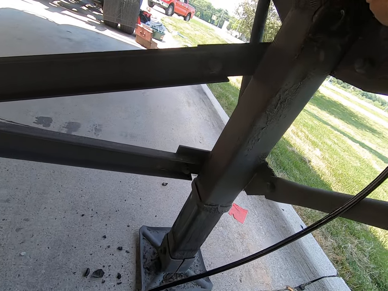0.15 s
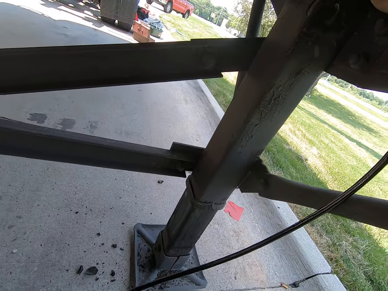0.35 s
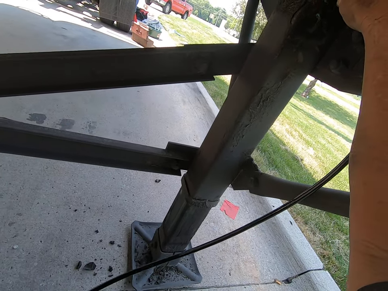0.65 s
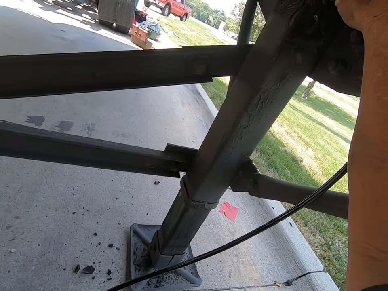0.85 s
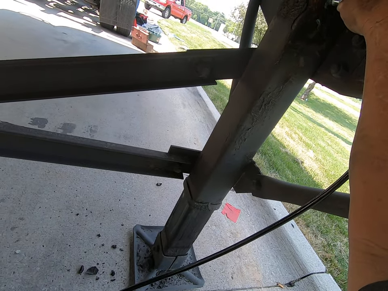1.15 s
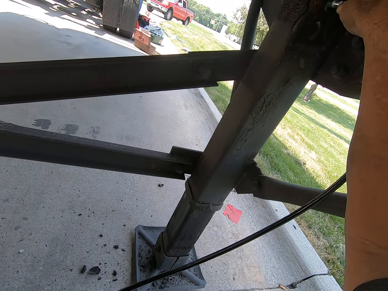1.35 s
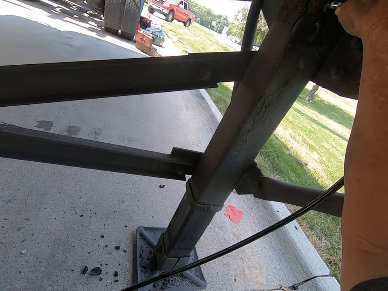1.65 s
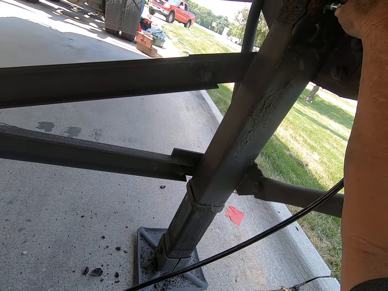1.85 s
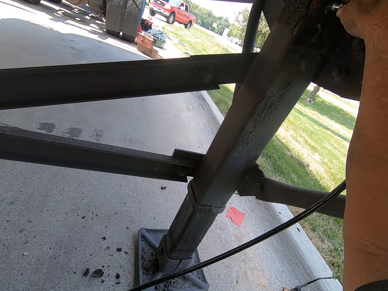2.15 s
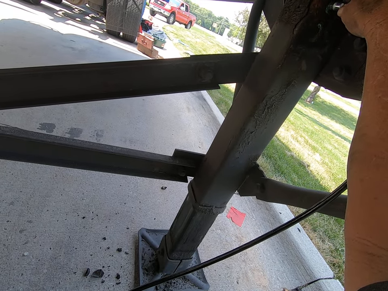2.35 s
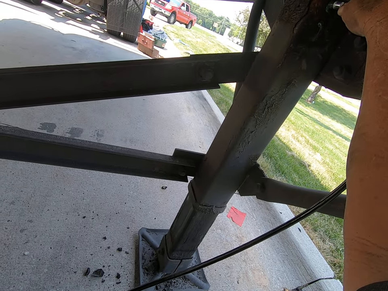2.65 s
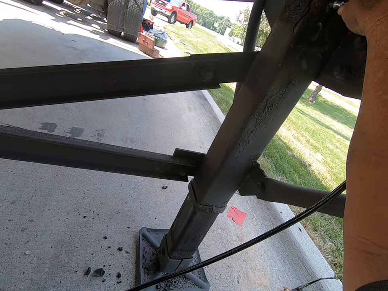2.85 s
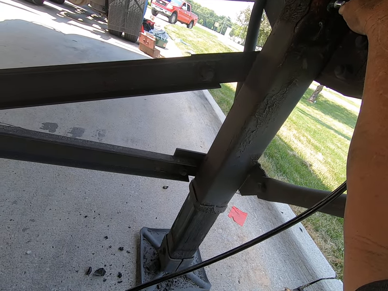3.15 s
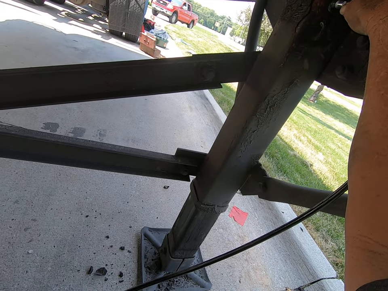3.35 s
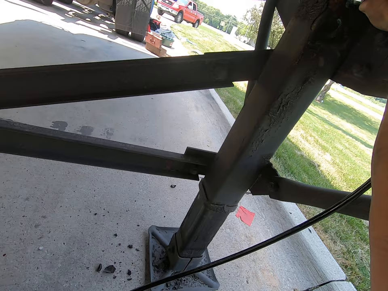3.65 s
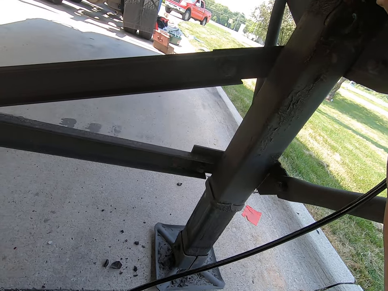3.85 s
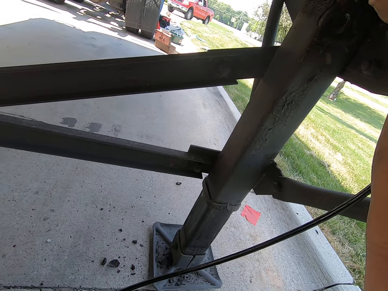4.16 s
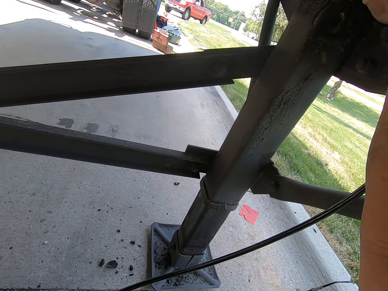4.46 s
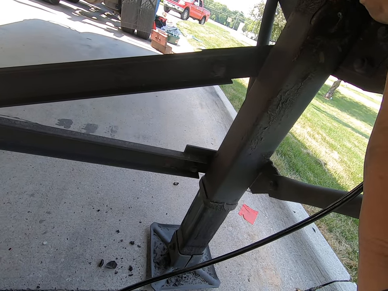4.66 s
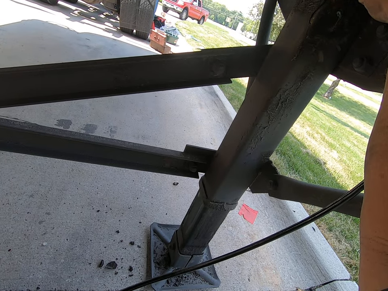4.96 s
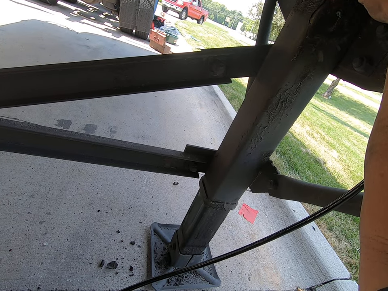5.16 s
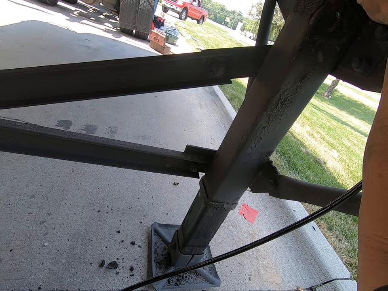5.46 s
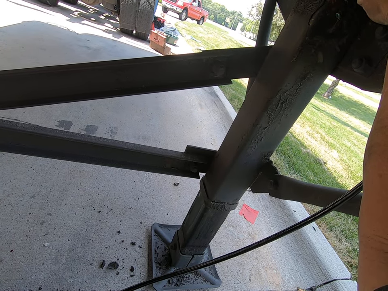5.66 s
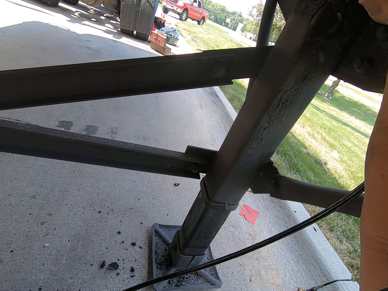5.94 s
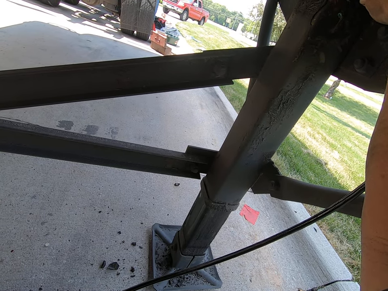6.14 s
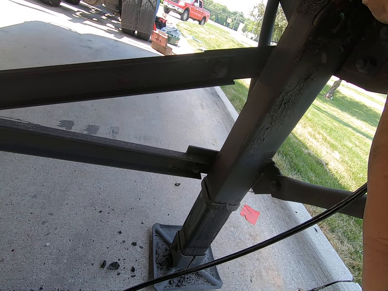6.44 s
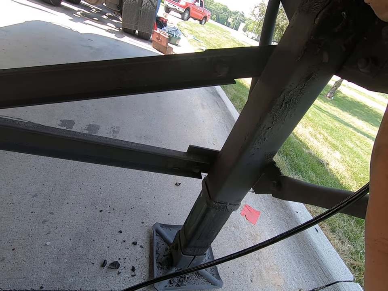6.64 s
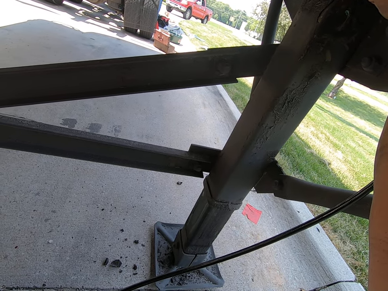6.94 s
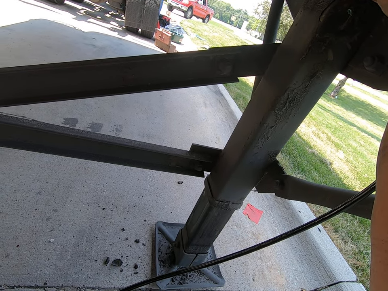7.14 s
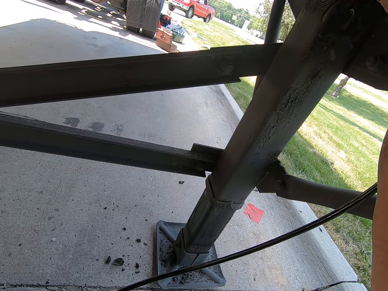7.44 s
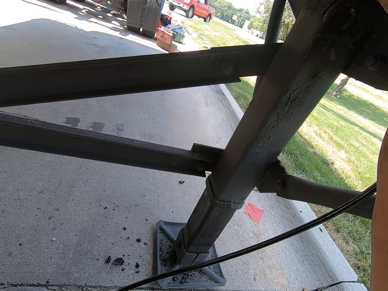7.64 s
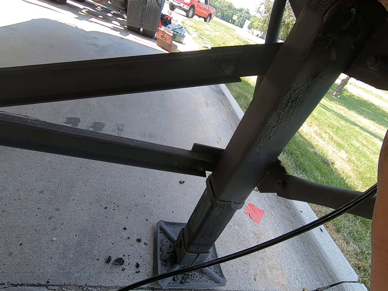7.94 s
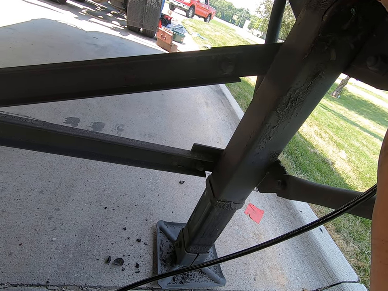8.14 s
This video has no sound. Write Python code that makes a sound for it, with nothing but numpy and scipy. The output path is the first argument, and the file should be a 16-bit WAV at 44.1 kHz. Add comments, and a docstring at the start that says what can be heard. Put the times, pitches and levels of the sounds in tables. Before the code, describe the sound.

A low, beating bed of several idling engines and a fan-like hum sits in the background. Something knocks the metal frame, a small plastic click follows, and a brief electronic whistle leads into a battery-powered grease pump right by the microphone. It buzzes and rattles harshly, whining high, clacking in a fast even rhythm as the plunger releases, without stopping. Dry open-air sound with short reflections off nearby steel.

```python
"""A cordless grease gun pumps under a trailer, close to the microphone: gear whine from a sine at the tooth rate,
rattle from noise in the housing modes. The motor slows on each plunger stroke and clacks as the cam lets go.
Further off in the yard three engines idle and beat against each other and a fan or alternator hums, all sums
of sines over a bed of shaped noise. A knock on the frame and the trigger come first, as pushes into resonances.
A small camera with two microphone ports and gain control listens."""
import sys
import numpy as np
from scipy import signal
from scipy.fft import rfft, irfft, next_fast_len
from scipy.io import wavfile
from scipy.ndimage import uniform_filter1d

SR = 44100
rng = np.random.default_rng(int(sys.argv[2]) if len(sys.argv) > 2 else 0)


def store_wav(level_fs):
    """Save 16-bit WAV to argv[1]."""
    pcm = np.round(np.clip(np.atleast_2d(level_fs), -1, 1) * 32767)
    wavfile.write(sys.argv[1], SR, pcm.T.astype(np.int16))


N = 365897
T = np.arange(N) / SR
FIRST_CLACK_S, STROKE_S = .9919, .13611  # the cam lets the plunger go once a turn
LEFT_RIGHT = np.array([[1], [-1]])


def undb(db):
    """Decibels to gain."""
    return 10 ** (np.asarray(db, float) / 20)


def unit(x):
    """Scaled to rms 1."""
    return x / np.sqrt(np.mean(x ** 2))


def ring(x, hz, width_hz):
    """One resonance, gain 1 at the centre."""
    return signal.lfilter(*signal.iirpeak(hz, hz / width_hz, fs=SR), x)


def colour(x, points):
    """Shapes the spectrum by (f/Hz, level/dB) points, joined along log frequency."""
    size = next_fast_len(len(x))
    hz, db = np.transpose(points)
    bin_hz = np.arange(size // 2 + 1) * SR / size
    gain = undb(np.interp(np.log(bin_hz + 1), np.log(hz), db))
    return irfft(rfft(x, size) * gain, size)[:len(x)]


def walk(rate):
    """Random levels held 1 / rate s and smoothed twice over that time; rms 1."""
    hold = int(SR / rate)
    steps = np.repeat(rng.standard_normal(N // hold + 1), hold)
    smooth = uniform_filter1d(uniform_filter1d(steps, hold), hold)
    return unit(smooth[:N])


def blows(times, db, contact_s, sharp=0.):
    """Short rough pushes of set strength at the given times; sharp adds a clean first contact."""
    size = int(6 * contact_s * SR) + 2
    fade = np.exp(-np.arange(size) / (contact_s * SR))
    push = rng.standard_normal((len(times), size)) * fade
    push = push * np.sqrt(contact_s * SR / 2) / np.linalg.norm(push, axis=1, keepdims=True)
    push[:, 0] += sharp
    out = np.zeros(N + size)
    places = (np.asarray(times) * SR).astype(int)[:, None] + np.arange(size)
    np.add.at(out, places, push * undb(db)[:, None])
    return out[:N]


def struck(hits, modes, contact_s, gain_db, sharp=0.):
    """A thing rings with its modes at every hit; two resonances in a row make each mode fall off steeply."""
    s, db = np.transpose(hits)
    push = blows(s, db, contact_s, sharp)
    ringing = sum(undb(mode_db) * ring(ring(push, hz, 3 * width), hz, width) for hz, width, mode_db in modes)
    return undb(gain_db) * ringing


def engines_and_hum():
    """Steady engine orders and a fan or alternator hum, multiples of each base rate, all wavering a little."""
    # three idling engines, then the hum of a fan or alternator: base rate [Hz]
    base_hz = [14.217, 18.655, 16.255, 138.0]
    # start of the first turn of each [s], which sets its phase
    start_s = [.01, 0.0029, 0, 0.00038]
    # one list for each of them: order [multiple of the base rate], level [dB]
    source_orders = [
        [(2, -78), (4, -32.5), (5, -56), (9, -51), (10, -47), (11, -74), (12, -39.5), (13, -40)],
        [(3, -36), (5, -55), (6, -53), (7, -76), (8, -47.5)],
        [(2, -57), (5, -44.5), (6, -55), (8, -43.5), (10, -46.5), (14, -53), (16, -53)],
        [(1, -32), (2, -51.5)],
    ]
    out = 0
    for hz, start, orders in zip(base_hz, start_s, source_orders):
        phase = 2 * np.pi * hz * (T - start)
        for order, db in orders:
            level = np.sqrt(2) * undb(db + 1.2 * walk(7))
            out = out + level * np.cos(order * phase + .15 * walk(5))
    return out


def yard():
    """Rumble and rush from all around: shaped noise that flickers with the clatter of the engines."""
    # exhaust rumble and mechanical rush: f/Hz, level/dB per Hz, relative
    rush = [(22, -13), (32, 1.5), (55, -0.5), (88, -3), (130, 1), (175, -2), (230, -13), (400, -16),
            (600, -15.5), (850, -23), (1300, -18.5), (1800, -26.5), (3200, -31.5), (5000, -48), (9000, -52),
            (11000, -60), (15000, -78)]
    # sound unrelated at the two ports, against the shared part: f/Hz, level/dB
    rush_apart = [(30, -9), (60, -13), (125, -19.5), (300, -15), (600, -7.5), (1100, 1), (3000, -3),
                  (14000, 2)]
    clatter = undb(1.0 * walk(40) + 0.53 * walk(2.6))
    mid, side = (undb(-29.5) * unit(colour(rng.standard_normal(N) * clatter, rush)) for _ in range(2))
    return mid + colour(side, rush_apart) * LEFT_RIGHT


def knock():
    """A knock lands twice on the frame, which keeps rattling for a moment; the first contact also cracks."""
    # landings: t/s, level/dB before the gains below
    landings = [(.2185, -19), (.2245, -25)]
    # frame modes: f/Hz, width/Hz of the sharper resonance, level/dB
    frame_modes = [(340, 100, 9.5), (474, 78, 11.5), (567, 43, 13.5), (685, 100, 8), (960, 120, 8.5),
                   (1250, 140, 7.5), (1400, 150, -2), (1690, 160, 2), (2270, 400, -30)]
    # modes of the first contact: f/Hz, width/Hz of the sharper resonance, level/dB
    crack_modes = [(3800, 1400, -3), (6840, 1100, -8.5)]
    frame = struck(landings, frame_modes, .03, 5.4, sharp=18.0)
    return frame + struck(landings[:1], crack_modes, 0.0039, 2.8)


def trigger():
    """Small contacts ring the trigger's own modes."""
    # contacts: t/s, level/dB before the gain below
    contacts = [(.7455, -36), (.7600, -23), (.7635, -27), (.7745, -40)]
    # trigger modes: f/Hz, width/Hz of the sharper resonance, level/dB
    trigger_modes = [(2700, 500, 2.5), (3480, 400, 0), (5000, 500, 2), (6960, 550, 5), (8400, 670, -2),
                     (12500, 3400, -20)]
    return struck(contacts, trigger_modes, 0.0025, 5.2)


def controller():
    """The speed controller switches the motor while the trigger travels: a steady tone and its octave."""
    # switching tone: t/s, level/dB at 1x, level/dB at 2x
    switching = [(.77, -70, -70), (.785, -49, -48), (.82, -40, -53), (.865, -39, -55), (.885, -67, -70)]
    switch_hz = 1984
    s, *levels = np.transpose(switching)
    out = 0
    for multiple, db in enumerate(levels, 1):
        level = np.sqrt(2) * undb(np.interp(T, s, db, -120, -120))
        out = out + level * np.sin(2 * np.pi * multiple * switch_hz * T)
    return out


def stroke(share):
    """Tooth mesh rate (Hz) and load (gain) through one turn of the cam, as shares counted from the clack."""
    fastest_at, slowest_at = .58, .9  # the motor speeds up unloaded and bogs down on the push
    free_mesh_hz, loaded_mesh_hz = 4380, 4008
    push_from, push_rise = .52, .1  # the grease load comes on
    rattle_fade = .16  # the parts settle after the release
    fall = slowest_at - fastest_at
    since = (share - fastest_at) % 1
    slowing = np.cos(np.pi / 2 * np.minimum(since / fall, 1)) ** 2
    speeding = np.sin(np.pi / 2 * np.maximum(since - fall, 0) / (1 - fall)) ** 1.3
    mesh_hz = loaded_mesh_hz + (free_mesh_hz - loaded_mesh_hz) * (slowing + speeding)
    load = np.exp(-share / rattle_fade) + np.clip((share - push_from) / push_rise, 0, 1)
    return mesh_hz, load


def gear_whine(mesh_hz, load):
    """The tooth mesh sings and swells as it passes resonances; other meshes are heard under load."""
    # resonances the whine passes: f/Hz, width/Hz, level/dB
    whine_modes = [(4020, 55, 2), (4264, 35, -.5), (4366, 55, -.5)]
    # other meshes: rate [multiple of the mesh], level/dB before load
    gear_lines = [(.79, -42), (.845, -40), (1.66, -42)]
    phase = 2 * np.pi * np.cumsum(mesh_hz * (1 + .0015 * walk(60))) / SR
    mesh = np.sqrt(2) * undb(-29 + 1.5 * walk(50)) * np.sin(phase)
    whine = sum(undb(db) * ring(mesh, hz, width) for hz, width, db in whine_modes)
    for multiple, db in gear_lines:
        whine = whine + load * undb(db + 3.1 * walk(40)) * np.sin(multiple * phase)
    return whine


def cam_blows():
    """The released plunger clacks and bounces, then the cam meets it again; timing and force scatter."""
    # blows within a clack, then the bounce: t/s from the release, level/dB
    clack_blows = [(-.0006, -2), (.0007, 0), (.002, -5), (.0036, -11), (.0072, -10), (.0086, -9),
                   (.011, -14)]
    clack_db, clack_scatter_db = 1.5, 1.7
    engage_s, engage_db = .0805, -8  # the cam meets the plunger again
    at = np.arange(FIRST_CLACK_S, N / SR, STROKE_S)
    luck = rng.standard_normal((len(clack_blows) + 1, 2, len(at)))
    clack = 0
    for (lag, db), (late, force) in zip(clack_blows, luck):
        blow_db = clack_db + db + clack_scatter_db * force
        clack = clack + blows(at + lag + .0002 * late, blow_db, .0003, sharp=2.5)
    late, force = luck[-1]
    engage = blows(at + engage_s + .001 * late, engage_db + 1.6 * force, .0004, sharp=4.5)
    return clack, engage


def grease_gun():
    """Tooth whine and gear rattle follow the stroke; rattle and blows ring the housing."""
    # motor run-up: t/s, rattle level/dB, whine level/dB, both against full speed
    run_up = [(.77, -22, -60), (.83, -21, -45), (.88, -5.5, -30), (.915, -0.5, 2), (.95, -2, -10)]
    # housing modes: f/Hz, width/Hz of the sharper resonance, then level/dB running, loaded, at the clack
    # and as the cam engages, and left minus right [dB]
    housing = [(626, 320, -43, -41.5, -16, 2, 1), (1068, 200, -37, -37.5, -29, -1, 4.5),
               (1370, 86, -41.5, -44, -21, -8, 12.5), (1545, 110, -48.5, -49, -11, -6, -15),
               (1790, 224, -37.5, -42, -22, -34, 12), (2255, 230, -33.5, -36, 1, 7, 1.5),
               (2490, 97, -38, -42.5, -6, -6, -3.5), (2694, 270, -35.5, -33, 1, 6, 1),
               (3247, 590, -34, -34, -28, 4, 0), (3703, 340, -40, -34, -44, -12, -1.5),
               (4180, 450, -33, -34.5, -38, 2, 1), (4545, 250, -42.5, -42, -7, -24, 12),
               (4920, 280, -39.5, -39, 2, 1, 2.5), (5510, 460, -44, -41.5, -1, -10, -7),
               (5820, 300, -54, -43, 1, -27, 0), (6300, 470, -42, -39.5, -4, -25, 3),
               (7180, 530, -40.5, -35.5, 3.5, -18, 0), (7590, 230, -44.5, -45.5, -1, -12, -7),
               (8260, 710, -42, -39, -2, -17, -3.5), (9000, 440, -41.5, -40.5, -5, -7, 5),
               (9860, 1230, -46, -44, -37, -21, 3.5), (13000, 2900, -59, -57, -27, -30, 3.5)]
    start_s, spin_up_s, full_speed_s = .77, .045, 1  # motor starts; time constant of its speed; run-up over
    apart_hz = 9900  # above this the two ports hear unrelated parts of the housing
    mesh_hz, load = stroke((T - FIRST_CLACK_S) / STROKE_S % 1)
    # no stroke slows the motor before the first release
    spin = (1 - np.exp(-np.maximum(T - start_s, 0) / spin_up_s)) * stroke(0)[0]
    mesh_hz = np.where(T < FIRST_CLACK_S, spin, mesh_hz)
    s, run_db, rise_db = np.transpose(run_up + [(full_speed_s, 0, 0)])
    run = undb(np.interp(T, s, run_db, left=-120))
    rise = undb(np.interp(T, s, rise_db, left=-120))
    load = load * undb(1.1 * walk(9))
    # loose teeth chatter: the size of the noise flickers
    running = run * unit(undb(0.45 * walk(300) + 0.29 * walk(30)))
    loaded = run * load * unit(undb(1.8 * walk(350)))
    clack, engage = cam_blows()
    out = rise * gear_whine(mesh_hz, load) * undb(.4 * LEFT_RIGHT)
    for hz, width, running_db, loaded_db, clack_db, engage_db, pan_db in housing:
        # every panel of the housing is shaken by its own share of the chatter
        size = np.hypot(undb(running_db) * running, undb(loaded_db) * loaded)
        size = size * np.sqrt(SR / (np.pi * width))  # a narrow mode passes less of the noise
        shared, apart = size * rng.standard_normal((2, N))
        chatter = shared + min(hz / apart_hz, 1) * apart * LEFT_RIGHT
        drive = chatter + undb(clack_db) * clack + undb(engage_db) * engage
        out = out + ring(ring(drive, hz, 1.29 * width), hz, width) * undb(pan_db / 2 * LEFT_RIGHT)
    return out


def ports(x, tail_s):
    """Echoes off the steel nearby reach the two ports unalike; returns that side signal."""
    # side minus mid: f/Hz, level/dB
    side_points = [(30, -18), (125, -37), (300, -17), (600, -9), (1100, -7.5), (2300, -11), (4200, -12),
                   (8000, -5), (14000, -9)]
    size = int(5 * tail_s * SR)
    echo = rng.standard_normal(size) * np.exp(-np.arange(size) / (tail_s * SR))
    echoed = signal.fftconvolve(x, echo / np.linalg.norm(echo))[:N]
    return colour(echoed, side_points) * LEFT_RIGHT


def scene():
    """The gun close by; the engines, the hum and the knocked frame further off, slightly to the right."""
    far = engines_and_hum() + knock()
    around = (far + yard()) * undb(-.3 * LEFT_RIGHT)
    gun = trigger() + controller() + grease_gun()
    return gun + ports(gun.mean(axis=0), 0.0024) + around + ports(far, 0.0033)


def record(dry):
    """Gain control hears mostly the middle and treble and slowly turns loud sound down; the top is cut."""
    top_hz, threshold_db, follow_s = 15650, -35.0, .35
    heard = signal.lfilter(*signal.butter(1, 900, "high", fs=SR), dry.mean(axis=0)) ** 2
    slow = 1 / (follow_s * SR)
    loud_db = 10 * np.log10(signal.lfilter([slow], [1, slow - 1], heard) + 1e-9)
    gain = undb(-.35 * np.maximum(loud_db - threshold_db, 0))  # dB down per dB over
    top_cut = signal.ellip(10, .2, 80, top_hz, fs=SR, output="sos")
    return signal.sosfilt(top_cut, dry * gain * undb(2.5))


dry = scene()
out = record(dry)
store_wav(out)
```